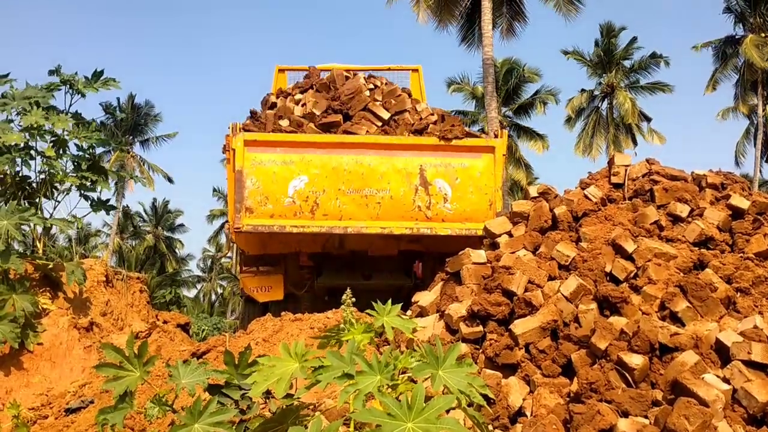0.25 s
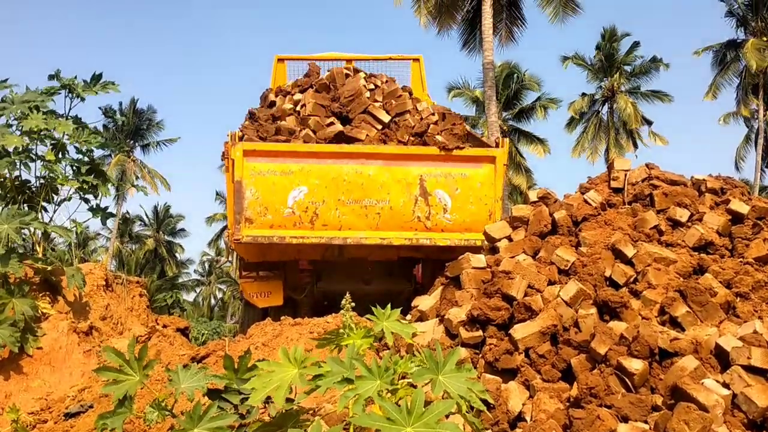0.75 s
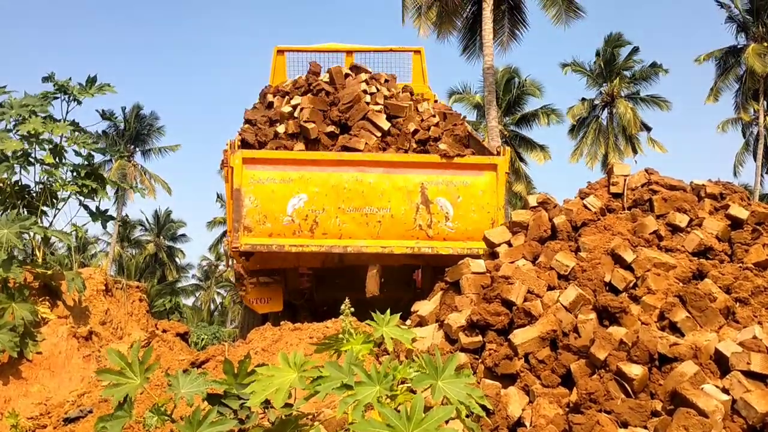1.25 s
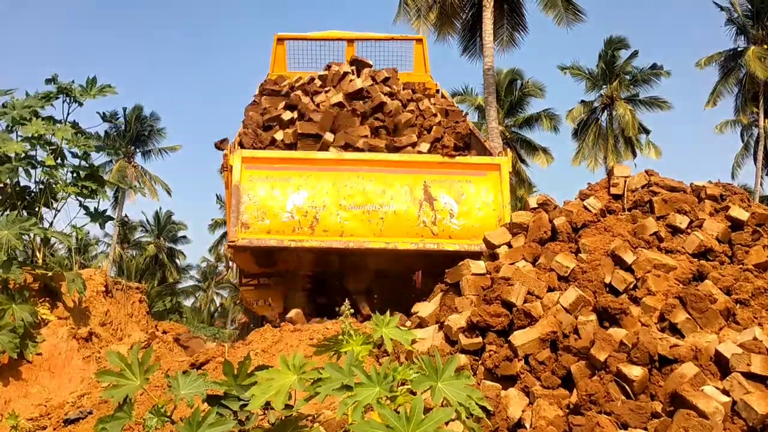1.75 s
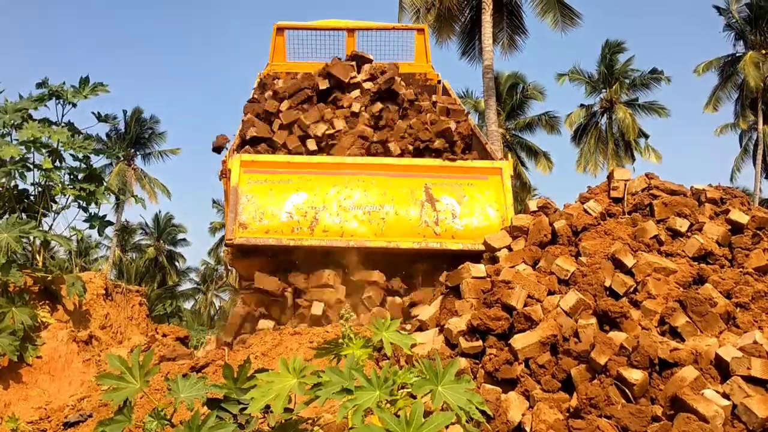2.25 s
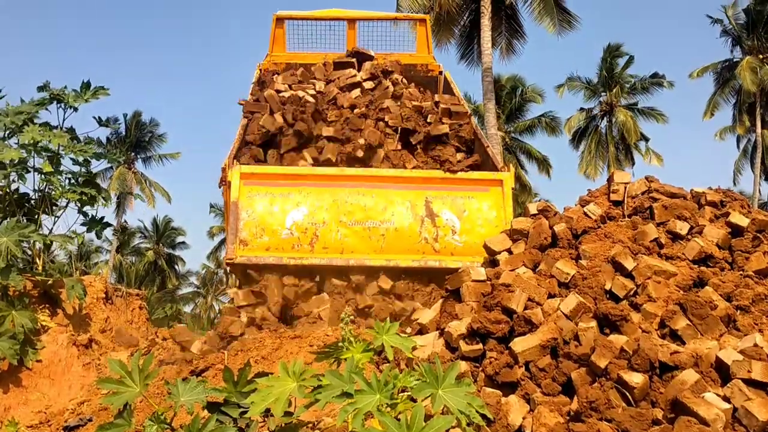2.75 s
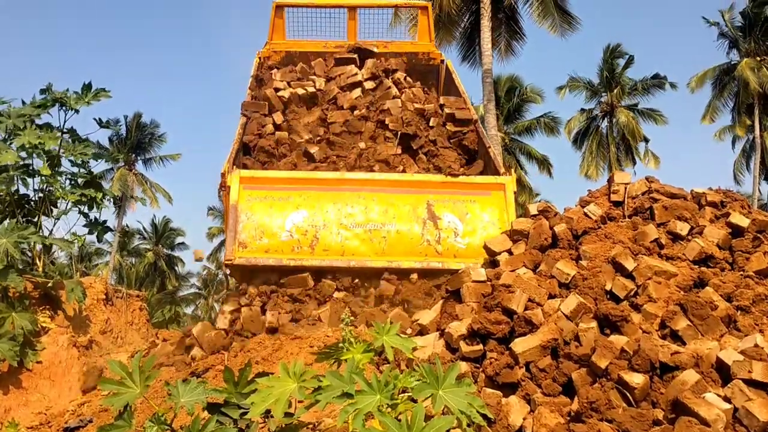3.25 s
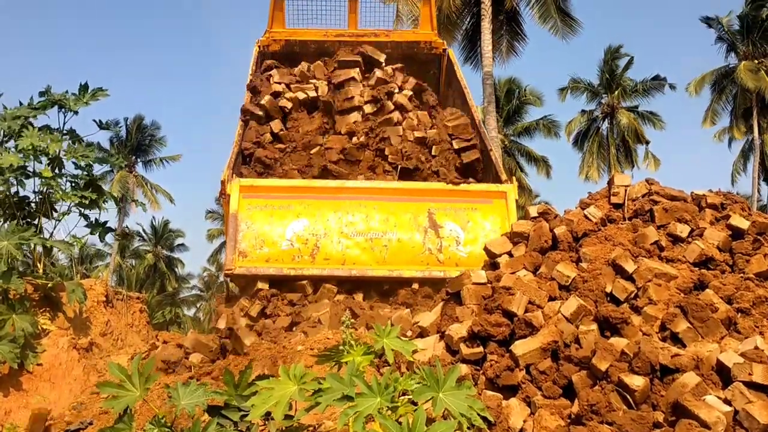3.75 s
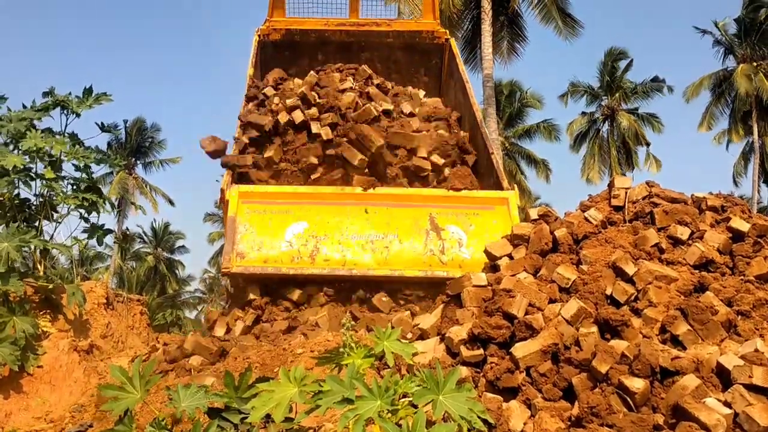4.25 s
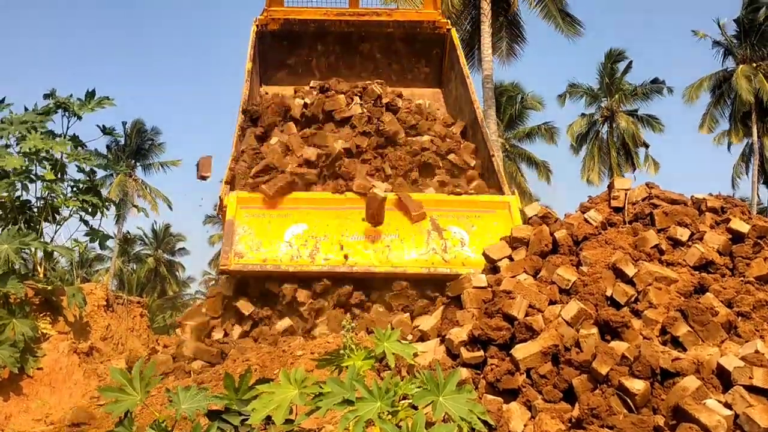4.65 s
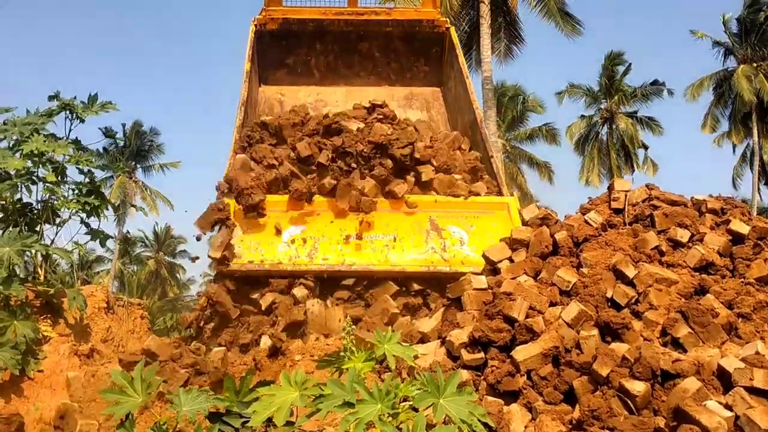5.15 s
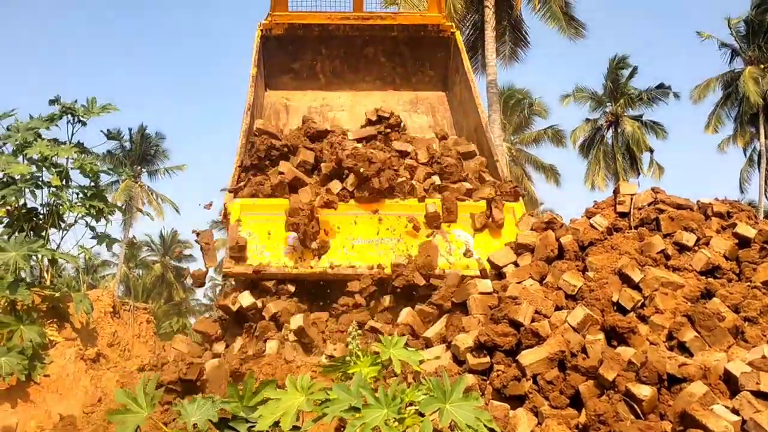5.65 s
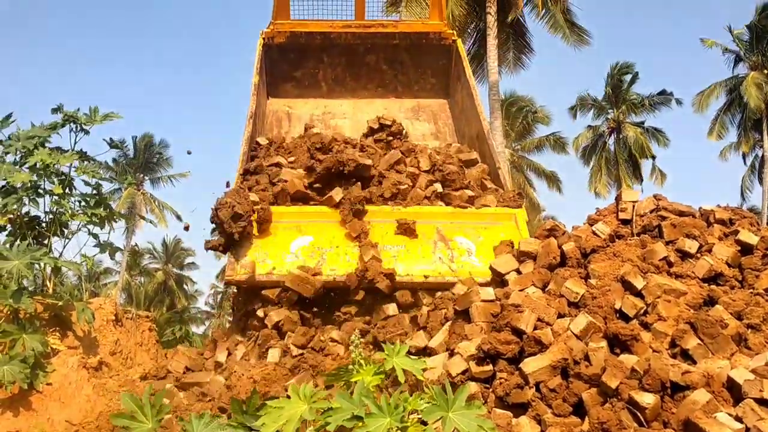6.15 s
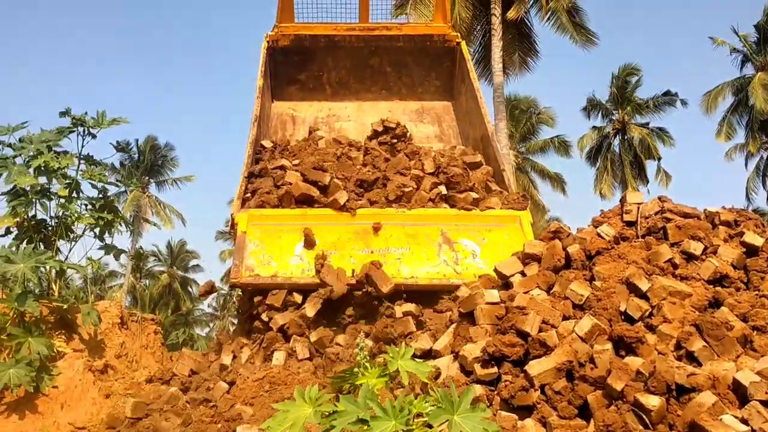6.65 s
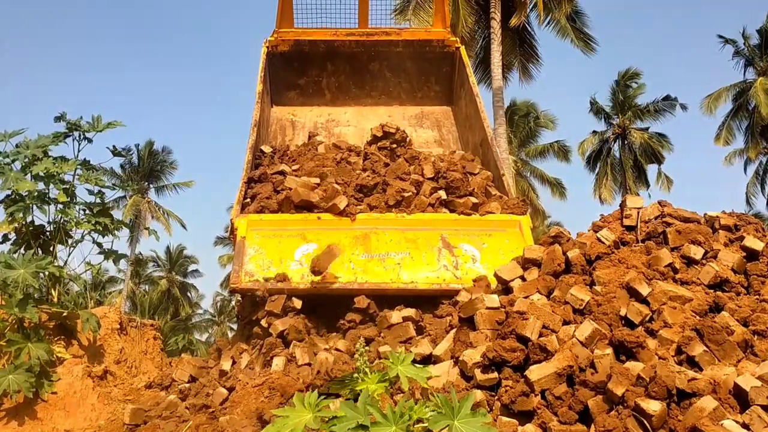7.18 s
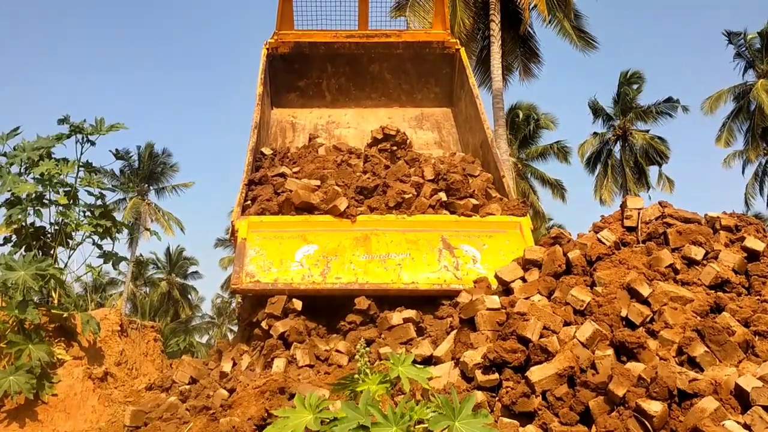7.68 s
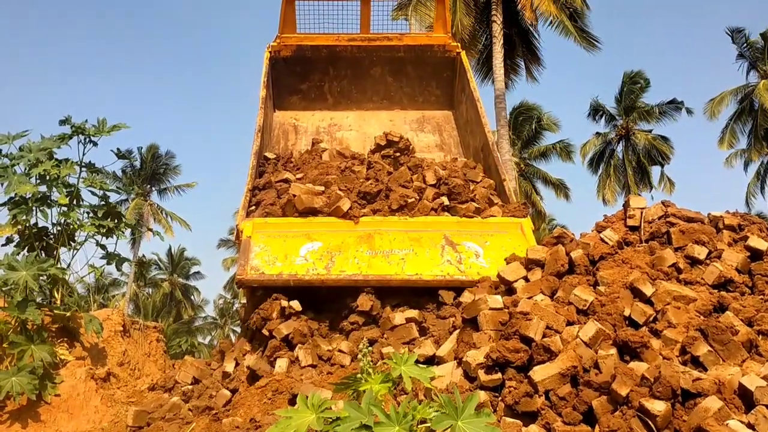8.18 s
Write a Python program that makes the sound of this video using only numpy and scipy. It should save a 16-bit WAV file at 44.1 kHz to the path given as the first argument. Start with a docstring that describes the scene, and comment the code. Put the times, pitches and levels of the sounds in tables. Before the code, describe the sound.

A tipper truck's diesel runs steadily while rough bricks clatter and tumble from its steel body in bursts, then the engine drops and revs again.

```python
"""Open ground, with a tipper truck some way off emptying rough bricks from its raised steel body.
Random knocks, shaped by surges and coloured as brick noise, carry the load; decaying tones make the thuds and cracks.
Tuned resonators ring the tailgate, and filtered noise gives grit and chips; thin gliding tones squeak.
The diesel is tones on its firing rate plus shaped noise: it holds its revs, drops to idle and is blipped once more."""
import sys
import numpy as np
from scipy import signal
from scipy.fft import rfft, irfft
from scipy.io import wavfile
from scipy.ndimage import uniform_filter1d

SR = 44100
rng = np.random.default_rng(int(sys.argv[2]) if len(sys.argv) > 2 else 0)


def dump(signal):
    """Clip the signal to [-1, 1] and save it as 16-bit WAV at the path in sys.argv[1]."""
    limited = np.clip(np.atleast_2d(signal).T, -1, 1)
    pcm = np.round(limited * 32767).astype(np.int16)
    wavfile.write(sys.argv[1], SR, pcm)


N = 371322


def undb(db):
    """Decibels to amplitude."""
    return 10 ** (np.asarray(db) / 20)


def level(x, db):
    """Set the rms level."""
    return x * undb(db) / np.sqrt(np.mean(x ** 2))


def curves(table):
    """Columns of a table after its times, drawn as lines with one value a sample."""
    s, *columns = np.transpose(table)
    return [np.interp(np.arange(N) / SR, s, c) for c in columns]


def band(x, lo_hz, hi_hz):
    """Band-pass filter."""
    return signal.sosfilt(signal.butter(2, [lo_hz, hi_hz], "bandpass", fs=SR, output="sos"), x)


def colour(x, table):
    """Filter with the spectrum of a table, drawn over log frequency."""
    hz, db = np.transpose(table)
    f = np.maximum(np.arange(N // 2 + 1) * SR / N, 1)
    return irfft(rfft(x) * undb(np.interp(np.log(f), np.log(hz), db)), N)


def noise(table):
    """White noise given the spectrum of a table."""
    return colour(rng.standard_normal(N), table)


def walk(rate):
    """Random levels joined by straight slopes, `rate` of them a second; rms 1."""
    k = int(SR / rate)
    steps = np.repeat(rng.standard_normal(N // k + 1), k)
    return level(uniform_filter1d(steps, k)[:N], 0)


def ring(x, hz, t60):
    """One resonant mode driven by x, dying 60 dB in t60 seconds."""
    pole = np.exp(2j * np.pi * hz / SR - np.log(1000) / (t60 * SR))
    return signal.lfilter([1], [1, -pole], x).imag * np.sqrt(1 - abs(pole) ** 2)


def add(out, s, sound):
    """Mix a sound in at s seconds."""
    i = int(s * SR)
    out[i:i + len(sound)] += sound[:len(out) - i]


def blow(t60, rise_s):
    """Envelope of one impact: a quick rise against an exponential decay."""
    t = np.arange(int(t60 * SR)) / SR
    return (1 - np.exp(-t / rise_s)) * 1000 ** (-t / t60)


def grains(rate, spread_db, t60):
    """Envelope of many overlapping knocks, `rate` a second, some much bigger than the rest; rms 1."""
    chance = rng.random((2, N))
    size_db = np.minimum(-spread_db * np.log(1 - chance[1]), 3 * spread_db)
    size = (chance[0] < rate / SR) * undb(size_db)
    power = signal.fftconvolve(size ** 2, blow(t60, 0.0055) ** 2)[:N]
    return level(np.sqrt(np.maximum(power, 0)), 0)


# diesel revs: [t/s, firing rate f/Hz, firing tone level/dB, its octave level/dB]
ENGINE_REVS = [(0.0, 65, -35, -41.5), (1.15, 62.05, -43, -38.5), (2.79, 64.2, -35, -40.5),
               (3.78, 63, -31.5, -42.5), (4.29, 66.5, -30, -30.5), (4.75, 61.2, -32, -32),
               (5.53, 56.4, -47, -47), (5.91, 49.35, -38.5, -40), (6.71, 34.77, -27.5, -36.5),
               (7.06, 29.83, -33.5, -45), (7.29, 41.04, -32, -26), (7.6, 52.8, -33, -40.5),
               (7.85, 56.5, -34.5, -45), (8.21, 51.7, -29, -43), (8.42, 47.9, -29.5, -26)]
# spectrum of the engine noise: [f/Hz, level/dB per Hz]
ENGINE_NOISE = [(150, -50), (250, -11), (319, -4), (436, -15), (696, -6), (786, -8), (1130, -8),
                (1300, -12.5), (1490, -6.5), (2040, -8.5), (2510, 2), (4380, -16), (7240, -17),
                (8910, -20.5), (15800, -15)]
WORKING_HZ, PUMP_OFF_S = 63, 6.03  # firing rate while tipping; the tipping pump has fully stopped, fading out over the 0.12 s before
FREE_WOBBLE = 0.3  # share of the exhaust tones' wobble left once unloaded
FLICKER_DB, DRONE_WAVER_DB, PANEL_WAVER_DB = 1.2, 2.4, 2.6  # rms unevenness
# each: (level/dB at the working rate, dB lost per octave of lower revs, dB added while the pump loads the engine)
TWELFTH_LAW, DRONE_LAW, BOOM_LAW = (-41.5, 11, -6.5), (-39, 14.5, -1.9), (-42.5, 7.5, 3.8)
RATTLE_LAW, HISS_LAW = (-38.5, 7.4, 0.84), (-48, 0.67, 0.21)


def diesel():
    """Exhaust tones on the firing rate, a rough drone around them, body boom, pump hum, rattle and hiss."""
    hz, *tones_db = curves(ENGINE_REVS)
    pumping = np.clip((PUMP_OFF_S - np.arange(N) / SR) / 0.12, 0, 1)
    octaves = np.log2(hz / WORKING_HZ)
    laws = (TWELFTH_LAW, DRONE_LAW, BOOM_LAW, RATTLE_LAW, HISS_LAW)
    twelfth_db, drone_db, boom_db, rattle_db, hiss_db = (
        db + slope * octaves + load * pumping for db, slope, load in laws)

    wobble = FREE_WOBBLE + (1 - FREE_WOBBLE) * pumping
    turns = np.cumsum(hz * (1 + 0.021 * wobble * walk(25.01))) / SR
    tones = np.zeros(N)
    for k, db in enumerate([*tones_db, twelfth_db]):
        tones += undb(db + 3.7 * wobble * walk(30)) * np.sin(2 * np.pi * (k + 1) * turns + k)

    rough = level(band(rng.standard_normal(N), 36, 214), 0)
    rough += level(ring(rng.standard_normal(N), 170.2, 0.27), -3.5)
    drone = rough * undb(drone_db + DRONE_WAVER_DB * walk(12))
    air = level(band(rng.standard_normal(N), 29, 86), -43)

    edges_hz = [(250, 1400), (1400, 4300), (4300, 16000)]
    boom, rattle, hiss = (level(band(noise(ENGINE_NOISE), *edges), 0) for edges in edges_hz)
    pump = (level(ring(boom, 703, 0.11), -6.5) + level(ring(boom, 1146, 0.2), -16)) * pumping
    for panel_hz in (2310, 2473, 2537, 2765, 2950):  # loose panels, each wavering by itself
        panel = level(ring(rng.standard_normal(N), panel_hz, 0.1), -12)
        rattle += panel * undb(PANEL_WAVER_DB * walk(10))
    body = (boom + pump) * undb(boom_db + FLICKER_DB * walk(15))
    rattle = rattle * undb(rattle_db + FLICKER_DB * walk(15))
    hiss = hiss * undb(hiss_db + FLICKER_DB * walk(9.9))
    return np.sqrt(2) * tones + drone + air + body + rattle + hiss


# brief thin squeaks, before flutter: [t/s, f/Hz, level/dB, half length/s, glide/Hz per s]
SQUEAK_TONES = [(.44, 2180, -31.5, 0.032, 0), (0.442, 6150, -52, .03, 0), (.97, 6140, -45, 0.026, 0),
                (7.495, 2570, -36, 0.015, 0), (7.788, 2900, -37, 0.015, 1000),
                (8.046, 2930, -36, 0.035, 1502), (8.092, 2690, -34, 0.017, 500),
                (8.154, 3770, -35, 0.02, -1000), (8.157, 2610, -29, 0.021, 0),
                (8.324, 3000, -39, 0.044, -1200), (8.372, 2530, -36.5, 0.024, 0)]


def squeaks():
    """Short tones that swell, glide, waver in pitch, flutter in level and fade."""
    t = np.arange(N) / SR
    waver = 0.004 * np.cumsum(walk(70)) / SR  # rms 0.4 % of the pitch
    out = np.zeros(N)
    for s, hz, db, half, glide in SQUEAK_TONES:
        turns = hz * (t + waver) + glide * (t - s) ** 2 / 2
        out += undb(db) * np.exp(-((t - s) / half) ** 2) * np.sin(2 * np.pi * turns)
    return undb(3.5 * walk(90)) * out


# chips and pebbles: [t/s, tick level/dB, centre f/Hz]
CHIP_TICKS = [(1.249, -21.5, 9800), (1.322, -26, 4330), (1.462, -31, 4060), (1.9275, -21, 4160),
              (2.0951, -31, 11800), (2.144, -31, 5950), (2.603, -19, 4200), (2.6299, -18, 4300),
              (2.659, -16, 4150), (2.9652, -29, 11760), (3.111, -25, 3940), (3.2547, -37, 7080),
              (3.548, -30, 4700), (4.1774, -13.5, 4560), (4.5396, -30, 7480), (4.6418, -29, 7074),
              (5.0753, -24, 4020), (5.5628, -32, 7370), (5.673, -33, 7610), (5.713, -30, 7400),
              (6.098, -37, 10600), (6.458, -36, 12400), (6.8354, -40, 7190), (6.892, -37, 7030),
              (6.981, -32.5, 14100)]


def chips():
    """Short bright ticks of band noise, each with a ring of its own at its centre."""
    out = np.zeros(N)
    shape = blow(0.078, 0.0051)
    for s, db, hz in CHIP_TICKS:
        tick = rng.standard_normal(len(shape))
        tick = level(band(tick, 0.7 * hz, min(1.5 * hz, 18000)), 0)
        note = level(ring(tick, hz, 0.035), -5.5)
        add(out, s, undb(db) * shape * (tick + note))
    return out


# heavy lumps landing: [t/s, relative level/dB, settled f/Hz, t60/s]
LUMPS = [(0.224, -6.5, 153, 0.072), (0.958, -0.5, 133, 0.039), (1.316, -3, 108, 0.065),
         (1.379, -25, 119, 0.055), (1.891, -12, 205, 0.16), (1.952, -6.5, 98, 0.13),
         (1.998, -7.5, 201, 0.16), (2.6, -15.5, 205, 0.21), (3.262, -17.5, 195, 0.1),
         (3.382, -8, 118, 0.066), (3.525, -18.5, 128, 0.33), (3.769, -20, 124, 0.11),
         (4.035, -19.5, 132, 0.087), (4.161, -12.5, 180.5, 0.16), (4.328, -11.5, 213, 0.086),
         (4.411, -15.5, 150, 0.12), (4.63, -18, 144.6, 0.073), (4.742, -3.5, 115, 0.068),
         (5.26, -15, 148.2, 0.068), (5.29, -9.5, 114, 0.087), (5.383, -16.5, 104, 0.16),
         (5.452, -20, 139.8, 0.073), (5.488, -19.5, 107.3, 0.14), (5.562, -11.5, 165, 0.032),
         (5.64, -18, 125, 0.08), (5.7, -17, 135, 0.081), (5.788, -9.5, 116, 0.062),
         (5.832, -10.5, 130, 0.064), (5.897, -14, 171, 0.078), (5.945, -9, 138, 0.046),
         (6.083, -4, 125, 0.048), (6.101, -10, 137, 0.055), (6.203, -19, 139.5, 0.16),
         (6.405, -11, 173, 0.051), (7.141, 2.5, 122, 0.039), (7.168, -13.5, 111, 0.11)]


def thuds():
    """Each lump gives the ground a few swings, falling in pitch as it settles; the heap throws them back."""
    out = np.zeros(N)
    for s, db, hz, t60 in LUMPS:
        shape = blow(t60, 0.004)
        t = np.arange(len(shape)) / SR
        shape = shape * (1 - np.exp(-t * hz * 2 * np.pi))  # soft ground: the first swing swells
        turns = hz * (t + 0.001771 * (1 - np.exp(-t / 0.06)))  # starts 3 % sharp
        add(out, s, undb(db + 3.5) * shape * np.sin(2 * np.pi * turns))
    lag = int(0.0233 * SR)
    out[lag:] += undb(-13) * out[:-lag]
    return out


# steady slide of the load: [t/s, clatter level/dB, then rumble, grind, grit level/dB above the clatter]
STEADY_SLIDE = [(0.9, -58, -7, 9, -17), (1.25, -51.5, 19, 12, 4), (1.8, -61, 3, -6, -6),
                (2.4, -33, -9, -18, -15), (3.1, -49.5, 15.5, -19, 2), (3.7, -42, 3.5, 5, -7),
                (3.98, -38, 2, 2.5, -6.5), (4.4, -32.5, 8.5, 3, -6), (4.8, -28.5, -6, 6, -7.5),
                (5.11, -31, -4, 4, -9.5), (5.28, -47.5, 14.5, 7.5, 1.5), (5.9, -48.5, 14, 0, 2),
                (6.25, -45.5, 14, 6, -0.5), (6.4, -78, -5, 6, 29)]
# surges of bricks: [peak t/s, clatter level/dB, build-up/s, t60/s, then rumble, grind level/dB above the clatter]
BRICK_SURGES = [(0.975, -37, 0.018, 0.73, 10, -6), (1.21, -33, 0.046, 0.16, -10, -4),
                (1.335, -20, 0.031, 0.55, 6.5, -3), (1.5, -27, 0.31, 1, 5, -5),
                (1.958, -18.5, 0.11, 0.89, 2.5, -2.5), (2.16, -25, 0.17, 0.37, 0.5, -3.5),
                (2.658, -18.5, 0.22, 0.32, -1.5, 0), (2.8, -29.5, 0.5, 0.78, 0, 0),
                (2.999, -26, 0.056, 0.41, 1, -11), (3.17, -33.5, 0.13, 0.4, -9, -19),
                (3.3, -25, 0.098, 0.45, 7.5, -1), (3.523, -23.5, 0.026, 0.47, 3.5, -3),
                (4.21, -23, 0.19, 0.35, 2, -3), (4.331, -17, 0.016, 0.27, -5, -18),
                (4.451, -18.5, 0.026, 0.38, -4, -10), (4.65, -27, 0.03, 0.31, 0, 0),
                (4.722, -19.5, 0.012, 0.25, -6, -5), (8.158, -49.5, 0.15, 0.24, -13, 20)]
# loose earth and grit pouring with the bricks: [start t/s, length/s before the fall, grit level/dB]
EARTH_POURS = [(1.314, 0.22, -40.5), (1.863, 0.29, -42), (2.356, 0.18, -63), (2.581, 0.08, -35),
               (2.957, 0.031, -37.5), (3.247, 0.062, -45), (3.495, 0.074, -42), (4.147, 0.04, -35.5),
               (4.43, 0.042, -40), (5.663, 0.1, -46.5), (6.83, .09, -50.5)]
BUILD_DB, SURGE_GRIT_DB = 27, -18  # climb during the build-up; grit above the grind
POUR_RISE_S, POUR_FALL_S, POUR_GRIND_DB = 0.008, 0.035, 8  # grind above the grit


def surges():
    """Amplitudes of clatter, rumble, grind and grit: surges build, peak and die away over the steady slide."""
    t = np.arange(N) / SR
    slide_db, *above_db = curves(STEADY_SLIDE)
    flowing = (t > STEADY_SLIDE[0][0]) * np.clip((STEADY_SLIDE[-1][0] - t) / 0.024, 0, 1)
    power = (flowing * undb([slide_db, *(slide_db + db for db in above_db)])) ** 2
    for s, db, build_s, t60, rumble, grind in BRICK_SURGES:
        climb_db, decay_db = BUILD_DB * (t - s) / build_s, -60 * (t - s) / t60
        shape = undb(db + np.minimum(climb_db, decay_db))
        power += np.outer(undb([0, rumble, grind, grind + SURGE_GRIT_DB]), shape) ** 2
    for s, length_s, db in EARTH_POURS:
        rise, fall = (t - s) / POUR_RISE_S, 1 + (s + length_s - t) / POUR_FALL_S
        shape = np.clip(np.minimum(rise, fall), 0, 1)
        power[2:] += np.outer(undb([db + POUR_GRIND_DB, db]), shape) ** 2
    return np.sqrt(power)


def notes(flow, count=3600):
    """Countless tumbling bricks, each with its own short note; the flow sets their size."""
    out = np.zeros(N)
    for when, pitch, size, length in rng.random((count, 4)):
        hz = 380 * 9 ** pitch
        shape = blow((25 + 45 * length) / hz, 0.00059)
        db = min(-2.8 * np.log(1 - size), 8) - 3 * pitch
        tone = np.sin(2 * np.pi * hz * np.arange(len(shape)) / SR)
        add(out, when * N / SR, flow[int(when * N)] * undb(db) * shape * tone)
    return out


def clack(hz, t60, chance):
    """A brick's own note, with a close neighbour that beats against it and a quicker overtone."""
    shape = blow(t60, 0.0007)
    t = np.arange(len(shape)) / SR
    shape = shape * (1 + 0.7 * np.exp(-t / 0.004))  # extra swing of the first contact
    turn = 2 * np.pi * hz * t
    near = 1 + np.sign(chance[0] - 0.5) * (0.07 + 0.12 * chance[1])
    over = 1.4 + 0.35 * chance[2]
    neighbour = undb(-6) * np.sin(near * turn)
    overtone = undb(-12) * shape * np.sin(over * turn)
    return shape * (np.sin(turn) + neighbour + overtone)


# single bricks striking: [t/s, relative level/dB, brick f/Hz, grind level/dB relative to the blow, base t60/s]
BRICK_CRACKS = [(0.962, -13, 676, -9, 0.11), (1.197, -6.5, 2510, -13, 0.06), (1.197, -13, 643, -20, 0.083),
                (1.25, -22.5, 2270, 6, 0.11), (1.32, -5, 570, -14, 0.07), (1.338, -4.5, 2750, -22, .07),
                (1.337, -5, 700, -24, .095), (1.877, -10, 580, -10, .058), (1.885, -4, 1290, -22, 0.12),
                (1.923, -3.5, 743, -5, 0.12), (1.951, -3, 1525, -29, 0.16), (2.005, -10.5, 2470, -2, 0.096),
                (2.058, -10.5, 2800, -3, 0.065), (2.1, -9, 743, -8, 0.1), (2.153, -12, 1150, -12, .07),
                (2.364, -11, 794, -4, 0.15), (2.437, -14, 2340, -6.5, 0.25), (2.482, -12, 680, -7, 0.14),
                (2.577, -12, 406, -3, 0.28), (2.607, -5.5, 707, -10, 0.16), (2.632, -3.5, 2073, -6, .06),
                (2.662, -8, 650, -16, .07), (2.699, -4.5, 736, -14, 0.11), (2.727, -13.5, 1130, -9, 0.065),
                (2.79, -14, 810, -20, 0.075), (2.848, -13.5, 770, -4, 0.081),
                (2.939, -22.5, 2420, 7.5, 0.067), (2.98, -13.5, 606, -6, .08),
                (3.108, -16.5, 1040, 1, 0.064), (3.135, -12, 700, -10, 0.086),
                (3.252, -16.5, 730, -3, 0.082), (3.287, -5.5, 630, -17, 0.045),
                (3.501, -7.5, 792, -7, 0.098), (4.1, -13.5, 708, -22, .08), (4.129, -17.5, 2955, -7, 0.16),
                (4.177, -4, 2450, -2.5, 0.077), (4.222, -3.5, 2404, -7.5, 0.081),
                (4.325, -1.5, 666, -11.5, 0.14), (4.444, -2, 435, -5, 0.081), (4.64, -5, 595, -8.5, 0.11),
                (4.715, -2, 697, -10, 0.1), (4.718, -6, 2300, -13, 0.051), (4.758, -9, 2310, -6, .07),
                (4.796, 1, 667, -20, 0.057), (5.073, -7, 442, -8, 0.07), (5.21, -21, 790, -5, 0.057),
                (5.262, -17.5, 703, -9, 0.075), (5.293, -14, 616, -17, 0.1), (5.383, -19, 767, -24, 0.093),
                (5.453, -16, 656, -29, 0.066), (5.479, -6, 4000, -14, 0.0094),
                (5.492, -18, 1045, -2.5, .05), (5.535, -14, 700, -20, 0.06), (5.562, -16, 2720, -2.5, 0.05),
                (5.66, -20, 489, -13, 0.12), (5.684, -17, 2370, -11, 0.078), (5.703, -15.5, 767, -9, 0.056),
                (5.714, -14, 3280, -1.5, 0.06), (5.784, -18, 700, -7, .06), (5.858, -18.5, 1520, -9, 0.065),
                (5.9, -6.5, 1542, -30, 0.1), (5.908, -8.5, 716, -20, 0.077), (5.952, -14, 2240, -8, 0.063),
                (5.995, -16.5, 677, 1.5, 0.059), (6.042, -19, 723, -8, 0.077), (6.104, -17, 710, -7, 0.11),
                (6.221, -14.5, 616, -9.5, 0.056), (6.409, -26.5, 679, -2, 0.078),
                (6.563, -29.5, 2430, 5.5, 0.11), (6.583, -18.5, 1298, -18, 0.028),
                (6.8, -31, 680, -5, 0.071), (7.141, -15, 630, -15, 0.051), (7.142, -18.5, 1830, -10, .035),
                (7.16, -19, 648, -32, 0.089), (7.491, -31.5, 1460, 5, 0.14)]
CRACK_GRIT_DB = -21  # grit relative to the table's grind
CRACK_FOCUS_DB = 8  # the body loses this much per octave away from the brick's pitch


def cracks(body_centres_hz):
    """Each blow is a noise burst near the brick's pitch, grinding crumbs, grit and a pitched clack."""
    blows, pitched = np.zeros((7, N)), np.zeros(N)  # three body bands, two of grind, two of grit
    for (s, db, hz, grind, t60), chance in zip(BRICK_CRACKS, rng.random((len(BRICK_CRACKS), 3))):
        t60 = max(t60, 0.01)
        body = undb(db - 9) * blow(t60, 0.0017)
        crumbs = undb(db + grind - 7) * blow(1.48 * t60, 0.00031)  # grind on after the blow
        grit = undb(db + grind + CRACK_GRIT_DB) * blow(0.81 * t60, 0.001)
        focus = undb(-CRACK_FOCUS_DB * abs(np.log2(body_centres_hz / hz)))
        for row, part in zip(blows, [*(gain * body for gain in focus), crumbs, crumbs, grit, grit]):
            add(row, s, part)
        add(pitched, s, undb(db - 11) * clack(hz, 1.15 * t60, chance))
    return blows, pitched


# tailgate modes: [f/Hz, level/dB before the ringing curve, t60/s]
TAILGATE_MODES = [(382, -11, 0.24), (552, -10.5, 0.047), (457, -18, 0.15), (691.4, -9.5, 0.16),
                  (761.6, -7, 0.14), (831.6, -5.5, 0.23), (1064, -13.5, 0.06), (1161, -9.5, 0.14),
                  (1280, -17.5, 0.21), (1519, -12.5, 0.18), (1600, -10.5, 0.27), (2360, -16, 0.37)]
# how loudly the steel rings on, freest while the tailgate swings clear of the load: [t/s, level/dB]
TAILGATE_RINGING = [(1.2, -14.5), (2.0, -14.5), (2.6, -17), (2.8, -9), (2.95, -11), (3.2, -12),
                    (3.6, -13.5), (4.4, -20.5), (5.0, -25), (6.0, -16)]


def tailgate(knock):
    """Steel modes set ringing by whatever knocks them."""
    steel = sum(undb(db) * ring(knock, hz, t60) for hz, db, t60 in TAILGATE_MODES)
    return undb(curves(TAILGATE_RINGING)[0]) * steel


def load_shift(body_noise):
    """What is left of the load shifts in the body: a late burst of knocks that holds, then fades."""
    t = np.arange(N) / SR
    start_s, length_s, fade_s = 7.905, 0.19, 0.41
    fade = np.exp(-np.maximum(t - start_s - length_s, 0) / fade_s)
    return (t > start_s) * undb(-40) * fade * grains(110, 2, 0.12) * level(body_noise, 0)


# spectrum of tumbling bricks: [f/Hz, level/dB per Hz]
BRICK_NOISE = [(29, -51), (50, 7), (94, 7.5), (212, 8.5), (312, -6.5), (360, -1.5), (690, -3.5),
               (900, -5.5), (1490, -11), (1900, -17), (2410, -7.5), (4970, -22.5), (6970, -23.5),
               (8860, -25.5), (15800, -25)]
# for clatter, grind and grit: share of the knocking common to all bands, then each band's own
# knocks: unevenness/dB, rate per s, t60/s
KNOCKING = [(0.55, 1.5, 150, 0.06), (0.5, 2.5, 300, 0.035), (0.2, 3, 450, 0.025)]


def bricks():
    """The surge drives dense knocks; single blows stand out; the steel rings on whatever hits it."""
    clatter, rumble, grind, grit = surges()
    edges_hz = [60, 280, 550, 950, 1500, 2500, 4200, 8800, 16000]
    low, *bands = (band(noise(BRICK_NOISE), lo, hi) for lo, hi in zip(edges_hz, edges_hz[1:]))
    centres_hz = np.sqrt(np.multiply(edges_hz[1:-1], edges_hz[2:]))
    blows, pitched = cracks(centres_hz[:3])
    common = grains(170, 2.8, 0.05)

    groups = [bands[:3], bands[3:5], bands[5:]]
    layers = []
    for group, flow, hits, settings in zip(groups, (clatter, grind, grit), np.split(blows, [3, 5]), KNOCKING):
        shared, spread_db, rate, t60 = settings
        tumble = np.zeros(N)
        for band_noise, hit in zip(group, hits):
            # bricks of other sizes favour other bands: part of the knocking is each band's own
            own = grains(rate, spread_db, t60)
            knocking = shared * common ** 2 + (1 - shared) * own ** 2
            tumble += np.sqrt(flow ** 2 * knocking + hit ** 2) * band_noise
        layers.append(tumble / np.std(sum(group)))
    body, crumbs, gritty = layers

    knock = body + crumbs + pitched + load_shift(bands[0] + bands[1]) + undb(-1.5) * notes(clatter)
    ground = rumble * grains(110, 2.2, 0.089) * level(low, 0)
    return ground + knock + tailgate(knock) + gritty


def scene():
    """Engine behind, then squeaks, chips and landing lumps, with the bricks in front."""
    return (diesel() + squeaks() + chips() + thuds() + bricks())[None]


# microphone colour, with the dip from the ground bounce: [f/Hz, level/dB]
MICROPHONE_COLOUR = [(215, 0), (305, -5), (410, -3), (1900, 0.5), (2350, -1), (3250, -0.5), (4000, -4.5),
                     (5100, -6), (7000, 1.5), (8900, -4.5), (10500, 0), (15800, -6.5)]


def record(dry):
    """The microphone colours the sound, the loudest peaks are rounded and the top is cut."""
    heard = colour(dry, MICROPHONE_COLOUR)
    rounded = np.tanh(1.059 * heard) / 1.564
    top_cut = signal.ellip(10, 0.2, 80, 15800, fs=SR, output="sos")  # Hz
    return signal.sosfilt(top_cut, rounded)


dry = scene()
out = record(dry)
dump(out)
```